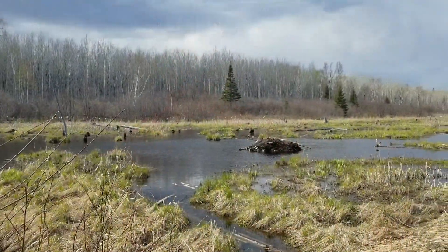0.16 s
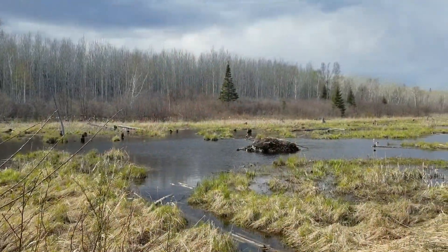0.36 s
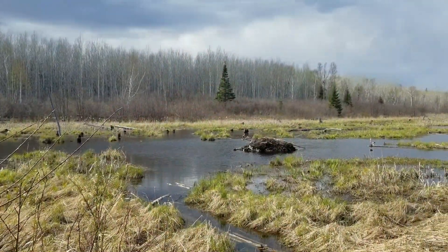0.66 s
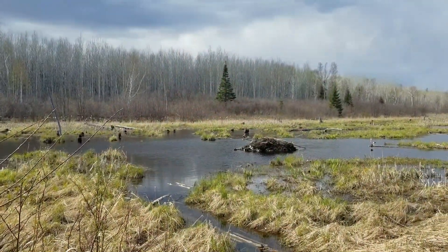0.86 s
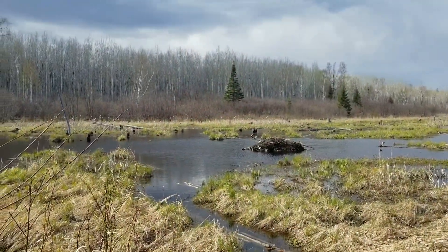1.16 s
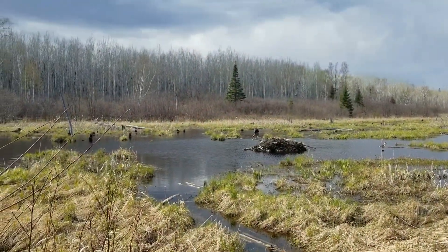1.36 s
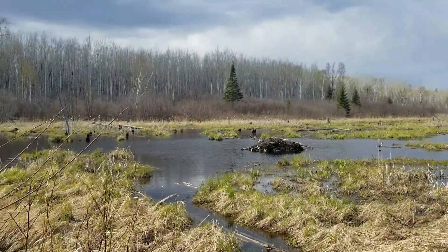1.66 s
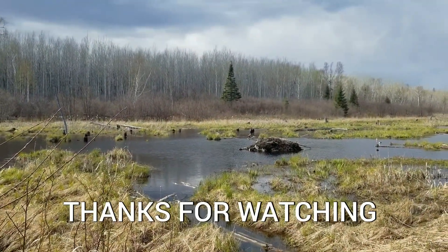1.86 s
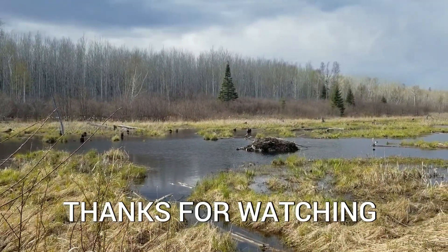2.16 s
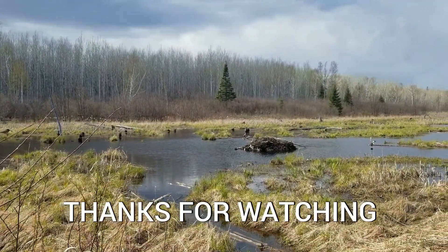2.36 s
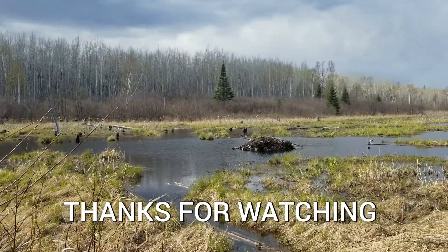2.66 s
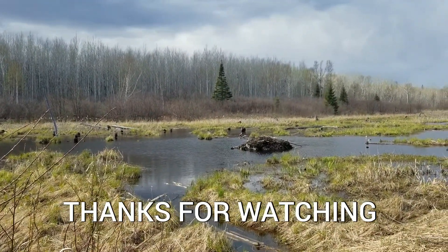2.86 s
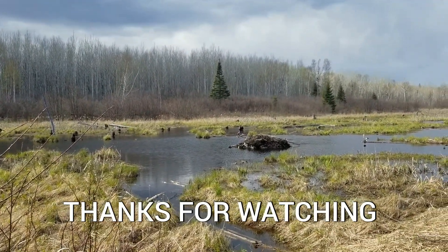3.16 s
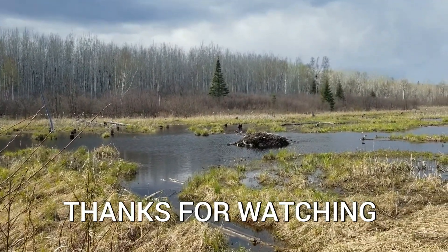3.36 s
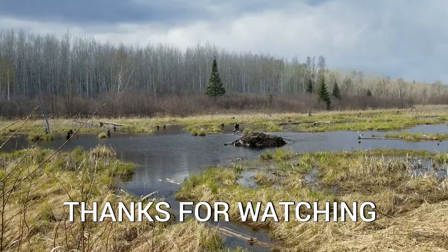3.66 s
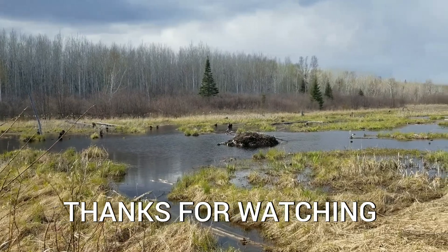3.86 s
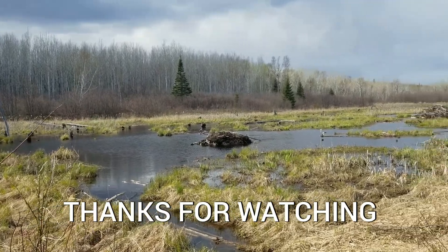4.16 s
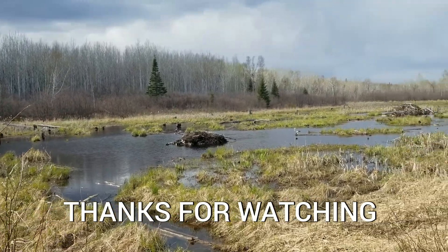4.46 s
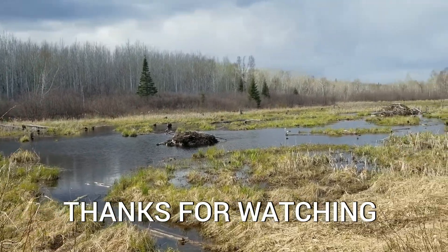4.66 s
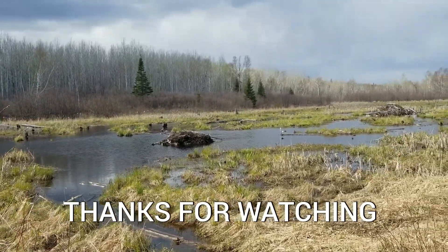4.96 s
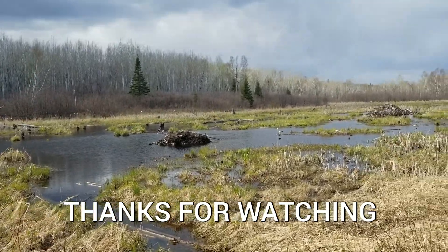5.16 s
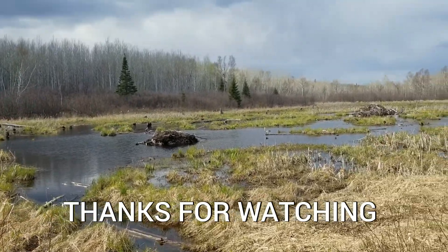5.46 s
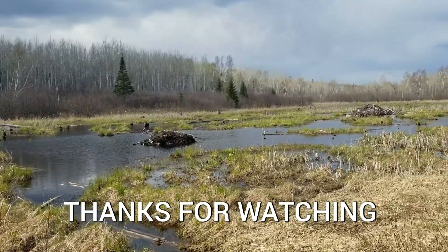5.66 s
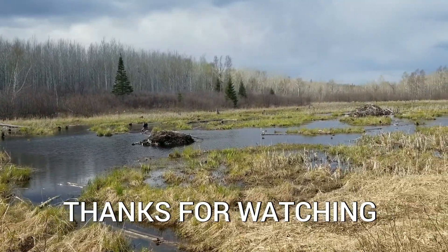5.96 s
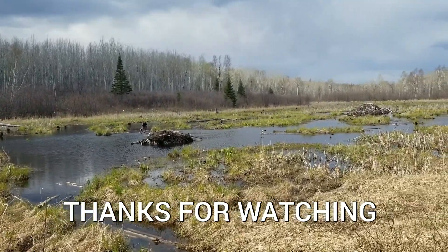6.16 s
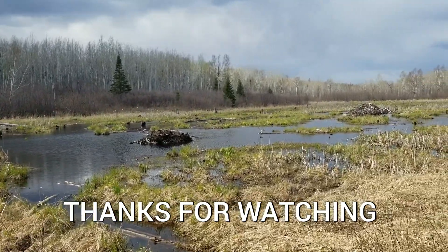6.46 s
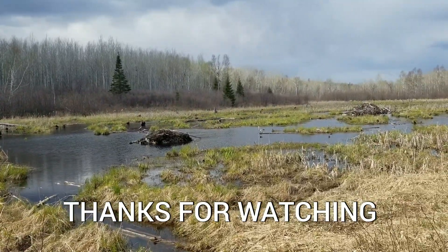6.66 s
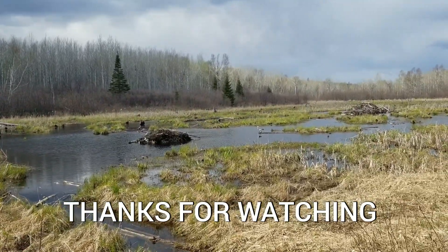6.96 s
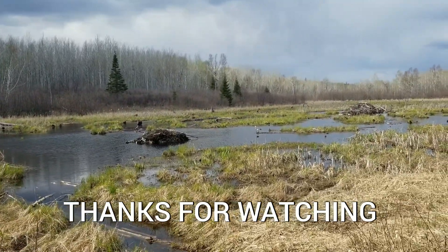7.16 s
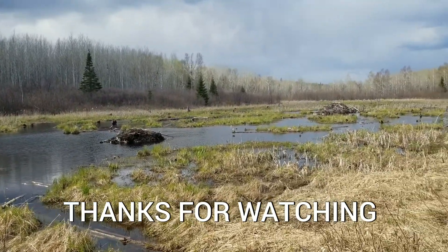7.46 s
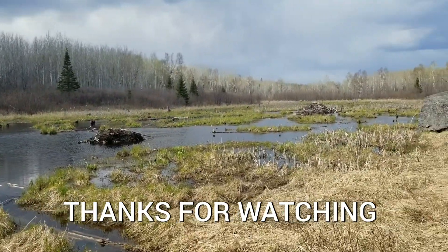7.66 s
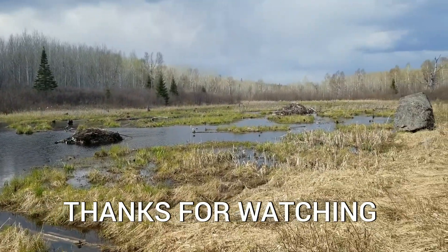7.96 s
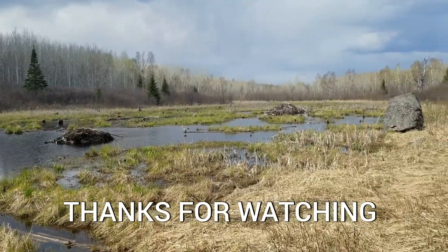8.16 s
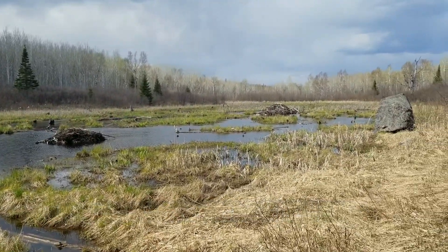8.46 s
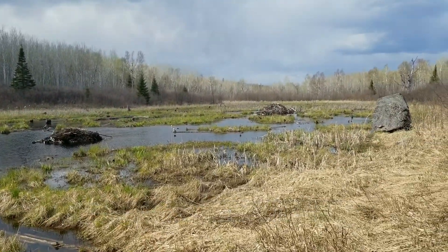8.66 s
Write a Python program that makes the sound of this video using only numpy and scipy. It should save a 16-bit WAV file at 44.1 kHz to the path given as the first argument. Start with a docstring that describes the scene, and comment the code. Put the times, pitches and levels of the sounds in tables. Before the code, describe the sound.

A continuous chorus of high, piping frogs around three kilohertz fills a wetland, a few loud and close, hundreds faint behind. Gusts hit two spaced microphones as deep, uneven thumps, strongest in the first second and a half and again midway, then die down. Brittle grass ticks and crackles in small bursts. Faint lower whistles and quick, dull clucks come through near the end, over soft airy background noise.

```python
"""A spring marsh at the edge of a forest, heard on two spaced microphones that turn slowly to the right.
Small frogs near and far give rising whistled peeps and pulsed trills: gliding sines shaped by a sac resonance.
Low whistles and dull clucks (fading sines) join them, and the forest answers with a diffuse noise tail.
Gusts thump as swinging lumps and flutter as uneven noise; dry grass hisses and crackles in bursts of noise.
Beneath lie steady coloured noises for the far air and the reeds."""
import sys
import numpy as np
from scipy import signal
from scipy.fft import rfft, irfft, next_fast_len
from scipy.io import wavfile
from scipy.ndimage import map_coordinates

SR = 44100
rng = np.random.default_rng(int(sys.argv[2]) if len(sys.argv) > 2 else 0)


def master_out(mix):
    """Clip the mix to full scale and print it as 16-bit PCM to the path in sys.argv[1]."""
    frames = np.transpose(np.atleast_2d(mix))
    ceiling = np.clip(frames, -1, 1)
    pcm = np.round(ceiling * 32767).astype(np.int16)
    wavfile.write(sys.argv[1], SR, pcm)


def convert_level_to_amplitude(level_db):
    """Map a level in decibels to its linear amplitude factor."""
    exponent = np.asarray(level_db, float) / 20
    return 10 ** exponent


N = 389403


def unit(x):
    """Normalization: a signal scaled to rms 1."""
    return x / np.sqrt(np.mean(x ** 2) + 1e-20)


def along(points, hz):
    """Logarithmic frequency scale: (Hz, value) points joined by lines on a log axis."""
    f, v = np.transpose(points)
    return np.interp(np.log(hz + 1), np.log(f + 1), v)


def curves(rows):
    """Linear interpolation: one value per sample for each column after the time."""
    s, *columns = np.transpose(rows)
    return [np.interp(np.arange(N) / SR, s, column) for column in columns]


def wobble(rate, size=16):
    """Slow random modulation: two smooth curves with rate knots a second, worked out every size samples."""
    knots = rng.standard_normal((2, N // 100))
    coarse = np.arange(0, N + size, size)
    smooth = [map_coordinates(k, [coarse * rate / SR]) for k in knots]
    return np.array([np.interp(np.arange(N), coarse, c) for c in smooth])


def noise(spectrum, alike=[(100, 0)]):
    """Partial coherence: stereo noise of rms 1 with a colour, mixed from independent mid and side."""
    m = next_fast_len(N)
    hz = np.fft.rfftfreq(m, 1 / SR)
    turn = np.arccos(np.clip(along(alike, hz), -1, 1)) / 2
    colour = convert_level_to_amplitude(along(spectrum, hz))
    pair = rfft(rng.standard_normal((2, m))) * colour * [np.cos(turn), np.sin(turn)]
    mid, side = irfft(pair, m)[:, :N]
    return unit(np.array([mid + side, mid - side]))


# Partials of the throat besides the whistle. Each row: multiple of the whistle's frequency,
# level in dB against the call's overtone level.
THROAT_PARTIALS = [(.5, -16), (1.5, -2), (2, -1)]


def add_whistle(out, s, length, start_hz, end_hz, db, lag_ms, bend, shape,
                pan_db=0, overtone_db=-44, sac_hz=2950):
    """Frequency glide and sac resonance: one whistle on both microphones, lag_ms later on the left."""
    t = np.arange(round(length * SR)) / SR - np.array([[lag_ms / 2], [-lag_ms / 2]]) / 1000
    u = np.clip(t / length, 0, 1)
    # a bent glide and its integral, which gives the phase
    rise = u + bend * u * (1 - u)
    risen = u ** 2 / 2 + bend * (u ** 2 / 2 - u ** 3 / 3)
    glide_hz = end_hz - start_hz
    phase = 2 * np.pi * (start_hz * t + glide_hz * length * risen) + rng.uniform(0, 2 * np.pi)
    # the vocal sac rings best at sac_hz
    sac_db = -3 * ((start_hz + glide_hz * rise - sac_hz) / 460) ** 2
    voice = np.sin(phase)
    for multiple, partial_db in THROAT_PARTIALS:
        # overtones grow with the push along the call
        voice = voice + convert_level_to_amplitude(overtone_db + partial_db + 2.5 * (u - 1.64)) * np.sin(multiple * phase)
    # moving air on the way makes the level shimmer, a rough throat adds a fast rasp
    shimmer_db = 2.8 * np.interp(t[0] * 60, np.arange(40), rng.standard_normal(40))
    rasp_db = 1.2 * np.interp(t[0] * 500, np.arange(300), rng.standard_normal(300))
    sides_db = np.array([[pan_db / 2], [-pan_db / 2]])
    call = convert_level_to_amplitude(db + sac_db + shimmer_db + rasp_db + sides_db) * shape(np.abs(t), u) * voice
    part = out[:, round(s * SR):][:, :t.shape[1]]
    part += call[:, :part.shape[1]]


def ahead_lag_ms(s):
    """Interaural-style delay: as the microphones turn right, the left lag of every direction shrinks."""
    return 0.21 - 0.027 * s


def peep_shape(t, u):
    """Amplitude envelope of a peep: a quick start, a slight swell, a short end."""
    start, end = np.minimum(t / .005, 1), np.minimum((1 - u) / .1, 1)
    return start * convert_level_to_amplitude(0.54 * u) * end


def trill_shape(rate, swell_db):
    """Amplitude modulation: the whistle chopped into uneven pulses, rate a second, that grow overall."""
    uneven_db = 2.5 * rng.standard_normal(40)

    def shape(t, u):
        cycle = rate * t
        pulses = .03 + np.abs(np.sin(np.pi * (cycle % 1) ** .5)) ** 2.4
        end = np.minimum((1 - u) / 0.018, 1)
        return pulses * convert_level_to_amplitude(uneven_db[cycle.astype(int)]) * convert_level_to_amplitude(swell_db * u) * end
    return shape


# Nearer peeps. Each row: start in seconds, length in seconds, start frequency in Hz,
# level in dB before the sac resonance and the shimmer, calling place ("low" names a gentle glide, not a pitch).
NEAR_PEEPS = [(0.12, 0.13, 2780, -47.5, "d"), (0.357, 0.19, 2900, -56, "d"), (0.784, 0.1, 2436, -54.5, "d"),
              (1.135, 0.058, 2970, -44.5, "d"), (.248, 0.064, 2910, -50, "c"),
              (0.288, 0.035, 2750, -40, "c"), (0.403, 0.13, 2672, -41, "d"),
              (0.378, 0.14, 3230, -52.5, "high"), (0.458, 0.092, 3200, -58, "c"),
              (0.524, 0.11, 2870, -43.5, "d"), (0.714, 0.12, 2657, -45.5, "d"),
              (0.727, 0.12, 2900, -59, "b"), (0.705, 0.11, 2744, -46.5, "close"),
              (0.795, 0.067, 2811, -31, "b"), (.842, 0.21, 2684, -42, "c"), (0.952, 0.18, 2930, -45, "b"),
              (0.998, 0.13, 2830, -68, "c"), (0.999, .12, 3160, -41, "high"),
              (1.075, 0.044, 2547, -51.5, "d"), (1.184, 0.11, 2703, -40.5, "d"),
              (1.26, 0.13, 2440, -50, "c"), (1.286, 0.11, 2840, -31, "c"), (1.299, 0.09, 2716, -41, "d"),
              (1.386, 0.18, 2660, -46.5, "d"), (1.544, 0.11, 2980, -48, "c"), (1.55, 0.048, 3140, -40, "b"),
              (1.684, 0.089, 2974, -43.5, "d"), (1.701, 0.15, 2736, -35.5, "b"),
              (1.69, 0.12, 3200, -58, "high"), (1.767, 0.071, 2870, -33, "c"), (1.83, 0.13, 2750, -48, "d"),
              (1.86, 0.12, 3020, -41, "c"), (1.878, 0.14, 2680, -36.5, "b"), (1.885, 0.1, 2760, -48, "c"),
              (1.493, 0.11, 2690, -39, "low"), (1.649, 0.1, 2860, -46, "close"),
              (2.067, 0.057, 2950, -48.5, "d"), (2.01, .12, 2815, -39.5, "d"),
              (2.024, 0.11, 2800, -45.5, "close"), (2.027, 0.13, 2635, -36.5, "c"),
              (2.457, .065, 3070, -52, "close"), (2.667, 0.063, 2950, -40, "high"),
              (2.31, 0.081, 3280, -45, "high"), (2.378, 0.084, 2614, -34.5, "c"),
              (2.508, 0.12, 2928, -41, "b"), (2.55, 0.11, 2800, -45, "close"),
              (2.568, 0.079, 2850, -36.5, "b"), (2.615, 0.11, 2670, -39, "d"),
              (2.71, 0.12, 2753, -36.5, "d"), (2.745, 0.037, 2816, -35, "d"), (2.908, 0.1, 2980, -44, "d"),
              (3.06, 0.19, 2684, -36, "b"), (3.085, 0.057, 3120, -50, "d"), (3.131, 0.12, 2435, -49.5, "c"),
              (3.187, .12, 2780, -42.5, "close"), (3.245, 0.07, 3340, -47, "high"),
              (3.345, 0.087, 2926, -40.5, "high"), (3.578, 0.092, 3060, -40.5, "d"),
              (3.785, 0.26, 2410, -55.5, "low"), (3.665, 0.13, 2930, -42.5, "d"),
              (3.76, 0.1, 2788, -40.5, "c"), (3.803, 0.12, 2790, -49.5, "close"),
              (3.848, 0.12, 3110, -41.5, "high"), (3.929, 0.14, 2800, -39.5, "d"),
              (4.126, 0.099, 2915, -42, "d"), (4.329, 0.17, 2300, -54.5, "low"),
              (4.939, 0.061, 2760, -40.5, "c"), (4.287, 0.095, 2690, -42, "c"),
              (4.433, 0.12, 2975, -43.5, "d"), (4.445, 0.067, 2826, -39.5, "c"),
              (4.465, 0.18, 2623, -37, "b"), (4.608, 0.13, 3210, -55.5, "close"),
              (4.752, 0.033, 3070, -34, "d"), (4.742, 0.09, 2916, -42.5, "close"),
              (5.074, .12, 2780, -40, "b"), (5.078, 0.11, 2710, -38, "d"), (5.185, 0.17, 2510, -47.5, "c"),
              (5.249, 0.085, 3260, -46.5, "high"), (5.442, 0.077, 3076, -50.5, "c"),
              (5.452, 0.092, 2900, -46.5, "c"), (5.425, 0.13, 2820, -42.5, "close"),
              (5.485, 0.16, 2688, -36, "b"), (5.515, 0.16, 2360, -54.5, "a"),
              (5.629, 0.072, 2760, -40.5, "c"), (5.76, 0.122, 2686, -44.5, "c"),
              (6.045, 0.09, 2940, -44, "close"), (6.062, 0.085, 2710, -36, "d"),
              (5.805, 0.087, 3040, -51, "b"), (6.013, .07, 2526, -53.5, "b"),
              (6.184, 0.099, 2866, -37.5, "b"), (6.67, .07, 2550, -55, "b"),
              (6.775, 0.053, 2830, -42.5, "a"), (6.442, 0.12, 2650, -73, "b"), (6.1, 0.11, 2575, -43, "c"),
              (6.189, 0.097, 2540, -48, "c"), (6.253, 0.075, 2800, -42, "b"),
              (6.354, 0.04, 2750, -44.5, "c"), (6.52, 0.16, 2628, -36.5, "c"),
              (6.577, 0.13, 2800, -43, "close"), (6.745, 0.069, 3120, -44.5, "low"),
              (7.044, 0.12, 2836, -37, "b"), (7.048, 0.082, 2685, -40.5, "d"),
              (7.424, 0.11, 2816, -43, "close"), (7.428, .14, 2580, -46.5, "d"),
              (7.445, 0.095, 2870, -38, "a"), (7.61, 0.084, 2675, -48.5, "b"),
              (7.63, .09, 3102, -47, "low"), (8.533, 0.054, 2475, -54, "b"),
              (8.555, 0.042, 2905, -47, "low"), (7.549, 0.05, 2590, -41.5, "b"),
              (7.554, 0.17, 2690, -40.5, "b"), (7.555, 0.11, 2936, -48.5, "c"),
              (7.635, 0.034, 2995, -52, "a"), (7.299, 0.053, 3060, -49, "c"),
              (7.358, 0.08, 3160, -53.5, "c"), (7.694, 0.14, 2727, -52.5, "c"),
              (7.82, 0.037, 3280, -68, "high"), (7.88, 0.18, 2820, -54.5, "c"),
              (7.921, 0.1, 2727, -46.5, "c"), (7.95, 0.11, 2550, -50.5, "c"),
              (8.204, 0.053, 2870, -61, "b"), (8.17, 0.054, 3120, -50.5, "low"),
              (8.031, 0.11, 2750, -43, "close"), (8.07, 0.075, 3000, -38, "c"),
              (8.281, 0.19, 2570, -59, "b"), (8.503, 0.077, 2980, -49, "c"),
              (8.618, 0.12, 2690, -49.5, "close"), (8.571, 0.18, 2717, -42.5, "b"),
              (8.627, 0.084, 3022, -40.5, "d"), (8.789, 0.083, 3010, -46.5, "d")]
# Calling places a to d from left to right, the closest frog, a high voice and one that climbs slowly
# (the last entry). Each entry: left lag against straight ahead in ms, mean overtone level in dB,
# steepness of the glide (factor).
CALLING_PLACES = {"a": (-0.084, -46, 1.5), "b": (-0.026, -40, 0.9), "c": (0.0008, -41, 1.01),
                  "d": (0.097, -36.5, 0.83), "close": (0.077, -23, 1.5), "high": (0.0053, -28.5, 1),
                  "low": (0.0098, -41, 0.39)}


def near_peeps():
    """Upward frequency glide: a peep climbs further when longer and less from a high start."""
    out = np.zeros((2, N))
    jump_hz, climb_hz_per_s, ceiling, middle_hz = 127.5, 2100, 0.292, 2800
    chances = rng.standard_normal((len(NEAR_PEEPS), 2))
    for (s, length, hz, db, place), (side, rich) in zip(NEAR_PEEPS, chances):
        lag_ms, overtone_db, steep = CALLING_PLACES[place]
        rise_hz = steep * (jump_hz + climb_hz_per_s * length - ceiling * (hz - middle_hz))
        add_whistle(out, s, length, hz, hz + rise_hz, db, lag_ms + ahead_lag_ms(s), .35, peep_shape,
                    3 * side, overtone_db + 4.0 * rich)
    return out


# Nearer trills. Each row: start in seconds, length in seconds, start frequency in Hz,
# level in dB before resonance, shimmer and pulsing, pulses per second.
NEAR_TRILLS = [(0, 0.094, 2800, -46.5, 36), (0.156, 0.33, 2770, -69, 40), (2.174, 0.1, 2760, -55, 28),
               (2.277, 0.18, 3030, -46, 34), (0.171, 0.12, 2460, -50.5, 40), (.358, 0.22, 2556, -40.5, 30),
               (1.269, 0.15, 3290, -52.5, 71), (2.688, 0.29, 2563, -54, 24), (3.357, 0.34, 2670, -45.5, 48),
               (4.606, 0.18, 2614, -39, 34.5), (4.688, 0.31, 3140, -52, 47), (4.975, 0.12, 3126, -40.5, 27),
               (4.793, 0.18, 2744, -50, 38), (5.063, 0.35, 2620, -42.5, 40), (5.614, 0.15, 2556, -57.5, 37),
               (5.83, 0.14, 2702, -57.5, 35.6), (6.37, 0.18, 3125, -51, 47),
               (6.722, 0.29, 2627, -43.5, 45.5), (6.901, 0.14, 2453, -46, 38), (6.92, 0.092, 2860, -45, 50),
               (7.016, 0.15, 2500, -55, 28), (7.148, 0.11, 2624, -45, 49), (8.022, 0.26, 2613, -54, 34),
               (8.304, 0.092, 2693, -41.5, 36)]


def near_trills():
    """Pulsed amplitude modulation of a climbing whistle that swells as it goes."""
    out = np.zeros((2, N))
    climb_hz_per_s, swell_db_per_s = 850, 13
    for s, length, hz, db, rate in NEAR_TRILLS:
        shape = trill_shape(rate, swell_db_per_s * length)
        add_whistle(out, s, length, hz, hz + climb_hz_per_s * length, db, 0.47 * ahead_lag_ms(s), -.2, shape)
    return out


# Faint short whistles, most of an octave under the peeps. Each row: start in seconds, length in seconds,
# start frequency in Hz, level in dB before resonance and shimmer.
LOW_WHISTLES = [(1.11, 0.049, 1720, -72), (1.713, 0.055, 1684, -57), (2.344, 0.053, 1720, -63),
                (2.77, 0.071, 1742, -56.5), (3.266, 0.13, 1616, -64), (3.42, 0.14, 1745, -61),
                (3.91, 0.053, 1600, -68), (4.25, 0.085, 1520, -73), (4.63, .07, 1650, -81),
                (5.176, 0.084, 1506, -68), (5.268, 0.052, 1630, -73), (5.471, 0.053, 1540, -68.5),
                (5.84, 0.053, 1484, -63), (6.436, 0.053, 1482, -63.5), (7.137, 0.071, 1534, -64),
                (7.25, 0.071, 1470, -67.5), (7.55, 0.045, 1470, -67), (7.75, 0.12, 1500, -68.5),
                (7.892, .06, 1740, -66), (7.95, 0.08, 1466, -70), (8.132, 0.072, 1544, -64.5),
                (8.2, .08, 1470, -67), (8.315, 0.057, 1480, -66), (8.36, 0.049, 1420, -72),
                (8.503, 0.09, 1510, -65), (8.63, 0.056, 1465, -73)]


def low_whistles():
    """Upward frequency glide at a lower pitch, with the resonance set at each start frequency."""
    out = np.zeros((2, N))
    climb_hz_per_s = 1000
    for s, length, hz, db in LOW_WHISTLES:
        add_whistle(out, s, length, hz, hz + climb_hz_per_s * length, db, .28, .3, peep_shape, sac_hz=hz)
    return out


# Low clucks of another frog. Each row: start in seconds, level in dB before a common lift of 6.5 dB
# and the envelope, frequency in Hz.
LOW_CLUCKS = [(.515, -58, 2300), (.55, -53, 2270), (.585, -57, 2210), (4.66, -56, 2300), (4.69, -61, 2260),
              (4.72, -58, 2270), (4.75, -61, 2250), (5.36, -58, 2250), (5.44, -59, 2270),
              (6.955, -53, 2250), (7.0794, -61, 1980), (7.0978, -51, 2150), (7.1312, -54, 2080),
              (7.1676, -50, 2300), (7.515, -62, 1960), (8.1045, -57.5, 2040), (8.405, -59, 2060),
              (8.4267, -54, 2130), (8.4522, -54, 2040), (8.4791, -58, 2010), (8.5425, -53, 2170),
              (8.7326, -56, 2040)]


def clucks():
    """Damped oscillation: short dull knocks of a throat sac, slightly earlier on the right."""
    out, t = np.zeros(N + SR), np.arange(SR // 10) / SR
    rise = 1 - np.exp(-t / 0.0018)
    for s, db, hz in LOW_CLUCKS:
        fade = convert_level_to_amplitude(db + 6.5 - 60 * t / 0.029)
        out[round(s * SR):][:len(t)] += fade * rise * np.sin(2 * np.pi * hz * t)
    return np.array([out[:N], np.roll(out[:N], -5)])


def far_frogs(count=720):
    """Superposition of many faint calls at random times; about one in three trills instead of peeping."""
    out = np.zeros((2, N))
    base_db = -58.5
    for moment, (a, b, c, d, e) in zip(rng.uniform(0, 1, count), rng.standard_normal((count, 5))):
        s, start_hz, lag_ms = moment * N / SR, 2775 + 130 * a, 0.15 + 0.067 * e
        db = base_db - 3 * abs(d)
        if b > .45:
            add_whistle(out, s, .3, start_hz, start_hz + 280, db + 4.5, lag_ms, -.4,
                        trill_shape(36 + 5 * c, 1.0))
        else:
            end_hz = start_hz + 340 + 50 * c - 40 * a
            add_whistle(out, s, 0.1 + 0.01416 * b, start_hz, end_hz, db + 6.0, lag_ms, .25,
                        peep_shape, overtone_db=-28)
    return out


def forest(x):
    """Diffuse reverberation: reeds and trees answer with a noise tail that falls 60 dB in 0.32 s."""
    t = np.arange(SR // 2) / SR
    fade = convert_level_to_amplitude(-60 * t / .32) * (1 - np.exp(-t / .008))
    tail = rng.standard_normal((2, len(t))) * fade
    return signal.fftconvolve(x, tail / np.linalg.norm(tail[0]), axes=1)[:, :N]


# Wind on the microphones. Each row: time in seconds, level in dB, left over right in dB.
WIND_LEVELS = [(0.0, -40, -9), (.34, -33.5, -8), (.58, -36.5, -12), (.69, -41, -1), (.9, -36.5, -9),
               (1.33, -40.5, -9.5), (1.6, -47, -11.5), (2.05, -67, -27), (2.48, -71, -13), (3.24, -58, 14),
               (3.32, -51, 14), (3.46, -45, 7), (3.91, -37.5, 17), (4.2, -54.5, 21), (4.6, -58, -4),
               (4.84, -77, 34), (5.09, -40, 9), (5.24, -59.5, 16), (5.56, -72, -32.5), (6.05, -38.5, 2.5),
               (6.66, -53, -9), (6.76, -65.5, -19), (7.08, -53.5, -16.5), (7.4, -60.5, -9),
               (7.72, -75, -13.5), (8.83, -57.5, -6)]
# Relative spectrum of the low buffeting. Each row: frequency in Hz, density in dB per Hz.
BUFFET_SPECTRUM = [(12, -53.5), (20, -11.5), (49, 6), (70, -1.5), (140, -11), (227, -31.5), (250, -26),
                   (320, -28), (550, -120)]
# Relative spectrum of the flutter. Each row: frequency in Hz, density in dB per Hz.
FLUTTER_SPECTRUM = [(120, -18.5), (200, 5), (399, -8), (638, -28), (704, -38), (800, -52), (1040, -62.5),
                    (1760, -120)]


def wind():
    """Turbulent pressure: lumpy buffets differing at each microphone, single thumps, a ragged flutter."""
    db, pan_db = curves(WIND_LEVELS)
    sides_db = np.array([pan_db / 2, -pan_db / 2])
    lumps = unit(convert_level_to_amplitude(2 * wobble(11)[0] + 3 * wobble(28)[0] + 2.5 * wobble(28)))
    buffet = convert_level_to_amplitude(db + sides_db) * lumps * noise(BUFFET_SPECTRUM, [(100, 0.24)])
    ragged = unit(convert_level_to_amplitude(9.1 * np.tanh(2.0 * wobble(30))))
    # the flutter grows faster than the wind: 1.29 dB per dB
    flutter_db = -52.5 + 1.29 * (db + 39.5) + 0.067 * sides_db
    push = convert_level_to_amplitude(flutter_db) * unit(ragged * lumps ** 0.86)
    thumps, thump_push = eddies()
    return buffet + thumps + (push + thump_push) * noise(FLUTTER_SPECTRUM)


# Single eddies hitting the microphones. Each row: middle in seconds, level of the lump in dB,
# left over right in dB, relative width (0.626 of it, in seconds, is the Gaussian's width).
EDDY_HITS = [(0.042, -28.5, -12.5, 0.019), (0.113, -35, 2, 0.011), (0.185, -20.5, -1.5, 0.021),
             (0.274, -40, -18, 0.018), (0.316, -21.5, -11, .012), (0.365, -19, 9, .016),
             (.421, -26.5, -10, 0.0076), (0.464, -26.5, -10, 0.02), (0.51, -22, 3, 0.034),
             (0.557, -20.5, 1, 0.021), (0.62, -15, -0.5, 0.0052), (0.762, -29.5, -7, 0.019),
             (0.833, -25.5, -16, .008), (0.858, -26, -15, .014), (0.894, -15, -2, 0.022),
             (.995, -35, 4, .02), (1.097, -28.5, 1, 0.018), (1.131, -31.5, -2, .012),
             (1.202, -28.5, -3, 0.022), (1.248, -31, -2, 0.021), (1.369, -26.5, 14.5, 0.014),
             (1.417, -26.5, -4, 0.02), (1.531, -35, 6, .03), (1.896, -39, 0, 0.063),
             (3.332, -20.5, 1, 0.042), (3.41, -15.5, 0, 0.02), (3.428, -11.5, 2, 0.02),
             (3.456, -22.5, 1, 0.01346), (3.52, -19.5, 1.5, 0.012), (3.553, -20.5, 1.5, 0.022),
             (3.623, -30.5, -9, .011), (3.686, -27, -1, 0.011), (3.807, -21.5, -9, 0.027),
             (3.901, -27, 14, 0.043), (3.939, -17.5, -2.5, 0.0086), (4.017, -20, -2, 0.0067),
             (4.046, -19, 1, 0.035), (4.492, -42.5, 4, 0.053), (4.929, -32.5, 19, 0.0538),
             (5.005, -32, 18, 0.043), (5.06, -32.5, -9, 0.027), (5.1, -42, -8, 0.016),
             (5.154, -32.5, 9.5, 0.036), (5.866, -43.5, -29, 0.094), (5.908, -26, -1, 0.014),
             (5.941, -28, -8, 0.02), (5.967, -35.5, 0, .008), (5.775, -44, -7, .008), (6, -33.5, -13, .014),
             (6.045, -29.5, -3, .018), (6.121, -29, -4, 0.0092), (6.152, -22.5, -2, 0.021),
             (6.237, -33, 5, 0.0068), (6.316, -36.5, -3, .025), (6.354, -39.5, 16, 0.02),
             (6.594, -39.5, -3, 0.13), (6.886, -67.5, -26, 0.11), (8.273, -51, -9, 0.075)]


def eddies():
    """Vortex passage: Gaussian lumps of a slowing swing, and the push each gives to the flutter."""
    thumps, push = np.zeros((2, N)), np.zeros((2, N))
    rumble, t = noise(BUFFET_SPECTRUM), np.arange(N) / SR
    chances = rng.standard_normal((len(EDDY_HITS), 3))
    for (s, db, pan_db, width), (turn, skew, pitch) in zip(EDDY_HITS, chances):
        near = slice(max(round((s - .1) * SR), 0), round((s + .1) * SR))
        u = (t[near] - s) / (0.626 * width)
        lump = convert_level_to_amplitude(db + np.array([[pan_db / 2], [-pan_db / 2]])) * np.exp(-u ** 2)
        # a harder or smaller eddy swings faster; each slows as it passes
        hz = (83.5 + 0.87 * (db + 27.5)) * (0.02516 / width) ** 0.33
        hz = hz * np.exp(.12 * pitch - 0.2047 * np.clip(u, -2, 2))
        side_phase = .95 * np.tanh(1.5 * skew) * np.array([[1], [-1]])
        swing = np.sin(2 * np.pi * np.cumsum(hz) / SR + 3 * turn + side_phase)
        swing = swing + 0.32 * (swing ** 2 - .5)  # pointed crests, round troughs
        thumps[:, near] += lump * (.55 * swing + .2 * rumble[:, near])
        push[:, near] += convert_level_to_amplitude(-24.5) * lump
    return thumps, push


# Steady hiss of the grass. Each row: time in seconds, level in dB.
GRASS_HISS = [(0.0, -60.5), (1.5, -55.5), (3.05, -58.5), (8.83, -62)]
# Brushes through the grass. Each row: middle in seconds, peak level of the movement in dB,
# Gaussian width in seconds.
GRASS_BRUSHES = [(.95, -63.5, 0.67), (1.189, -52, 0.12), (2.1, -50, 0.027), (2.158, -49.5, 0.011),
                 (2.303, -59, 0.15), (3.319, -68.5, 0.019), (3.459, -65, 0.029), (3.693, -68.5, 0.023),
                 (4.471, -55, 0.02), (4.595, -64.5, 0.0049), (5.09, -62, 0.073), (7.029, -52, 0.018),
                 (7.088, -56, 0.089)]
# Stems snapping. Each row: start in seconds, starting level in dB before the noise carrier.
STEM_SNAPS = [(0.68, -60.5), (0.9694, -40), (1.038, -54.5), (1.0986, -60.5), (1.1774, -52), (1.354, -53.5),
              (2.04, -48), (2.075, -51.5), (2.1112, -43), (2.155, -49.5), (2.17, -44), (2.6667, -63.5),
              (3.6873, -60), (4.423, -42.5), (4.436, -45.5), (4.941, -42.5), (4.9574, -38.5),
              (5.149, -55.5), (5.198, -57.5), (5.856, -45), (6.602, -50), (6.865, -51.5), (6.969, -51.5),
              (7.011, -46.5), (7.083, -42)]
# Relative spectrum of the dry rustle. Each row: frequency in Hz, density in dB per Hz.
RUSTLE_SPECTRUM = [(4120, -50), (7000, -24.5), (9740, -20), (11300, -7), (13700, -0.5), (15000, -4.5),
                   (15800, 6.5)]
# Relative spectrum of the reeds. Each row: frequency in Hz, density in dB per Hz.
REED_SPECTRUM = [(2120, -46.5), (3500, 0), (3950, -5.5), (4380, -3.5), (6350, -3), (8240, -14.5),
                 (9000, -46.5), (11700, -50.5), (19800, -120)]


def grass():
    """Random impulses: dry blades hiss in tiny ticks and crackle more as they move; single stems snap."""
    now = np.arange(N) / SR
    moving = convert_level_to_amplitude(curves(GRASS_HISS)[0])
    for s, db, width in GRASS_BRUSHES:
        moving = moving + convert_level_to_amplitude(db) * np.exp(-((now - s) / width) ** 2)
    ticks = convert_level_to_amplitude(1.6 * wobble(90) + 2.1 * wobble(400) + 1.2 * wobble(9)[0])
    click = convert_level_to_amplitude(-60 * np.arange(SR // 50) / SR / .004)  # falls 60 dB in 4 ms
    odds, size = rng.uniform(0, 1, N), rng.exponential(1, N)
    # 25 crackles a second when the movement is at -59.5 dB
    crackles = odds < 25 / SR * (moving / convert_level_to_amplitude(-59.5)) ** .8
    starts = crackles * moving * convert_level_to_amplitude(0.7 * size)
    for s, snap_db in STEM_SNAPS:
        starts[round(s * SR)] += convert_level_to_amplitude(snap_db)
    crackle = signal.fftconvolve(starts, click)[:N]
    bright = (moving * unit(ticks) + crackle) * noise(RUSTLE_SPECTRUM) * convert_level_to_amplitude([[-1.2], [1.2]])
    body = convert_level_to_amplitude(-10.0) * (crackle + convert_level_to_amplitude(-10.0) * moving) * noise(REED_SPECTRUM)
    return bright + body


def reeds():
    """Broadband noise with patchy amplitude modulation, partly shared by the two sides."""
    patchy_db = .8 * wobble(5)[0] + 1.5 * wobble(30)
    return convert_level_to_amplitude(-78.0 + patchy_db) * noise(REED_SPECTRUM)


# Relative spectrum of the far air. Each row: frequency in Hz, density in dB per Hz.
AIR_SPECTRUM = [(15, -47.5), (25, -7.5), (71, -12), (220, -7.5), (419, 1), (635, -9.5), (1060, -15),
                (1330, -14.5), (1520, -10), (1700, -13.5), (2300, -9.5), (2990, 2.5), (5060, -120)]
# Likeness of the far air at both microphones. Each row: frequency in Hz, coherence (0 to 1).
AIR_LIKENESS = [(100, 0), (300, 0.96), (700, 0.29), (1500, 0)]


def far_air():
    """Frequency-dependent coherence: drifting noise that is alike on both sides mostly near 300 Hz."""
    drift_db = 1.2 * wobble(3)[0] + 1.5 * wobble(9)[0]
    return convert_level_to_amplitude(-65 + drift_db) * noise(AIR_SPECTRUM, AIR_LIKENESS)


def scene():
    """Linear superposition: frogs and their echo over wind, grass, far air and reeds."""
    frogs = near_peeps() + near_trills() + low_whistles() + clucks() + far_frogs()
    return frogs + convert_level_to_amplitude(-10.5) * forest(frogs) + wind() + grass() + far_air() + reeds()


def low_pass(x):
    """Removes everything above the highest recorded frequency."""
    return signal.sosfilt(signal.butter(12, 16520, fs=SR, output="sos"), x)


def record(dry):
    """Band limiting: the deepest bass rolls off below about 40 Hz and nothing is kept above 15830 Hz."""
    m = next_fast_len(N)
    hz = np.fft.rfftfreq(m, 1 / SR)
    response = (hz < 15830) / (1 + (40 / (hz + 1)) ** 3)
    mix = irfft(rfft(dry, m) * response, m)[:, :N]
    return low_pass(mix)


dry = scene()
out = record(dry)
master_out(out)
```